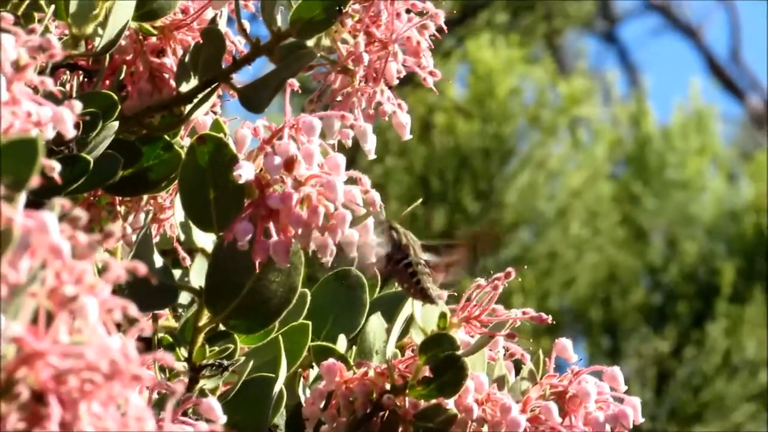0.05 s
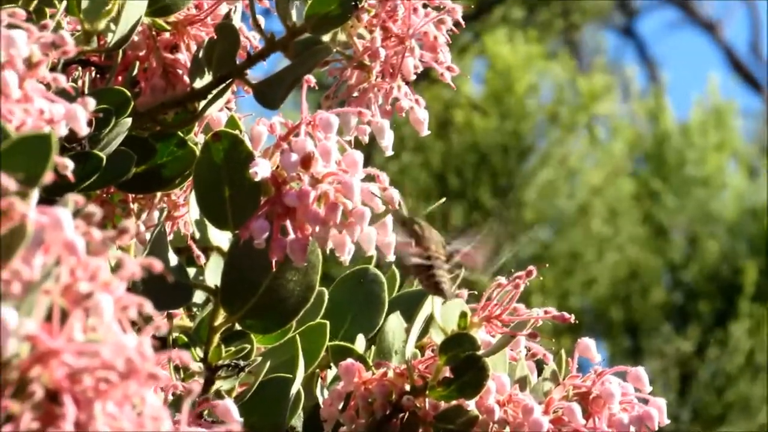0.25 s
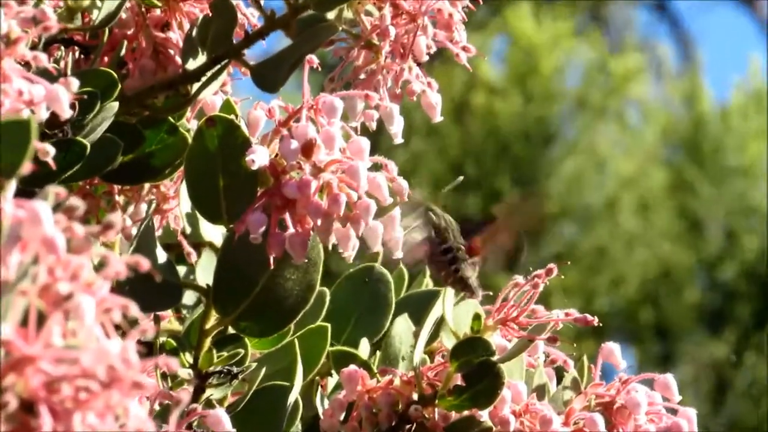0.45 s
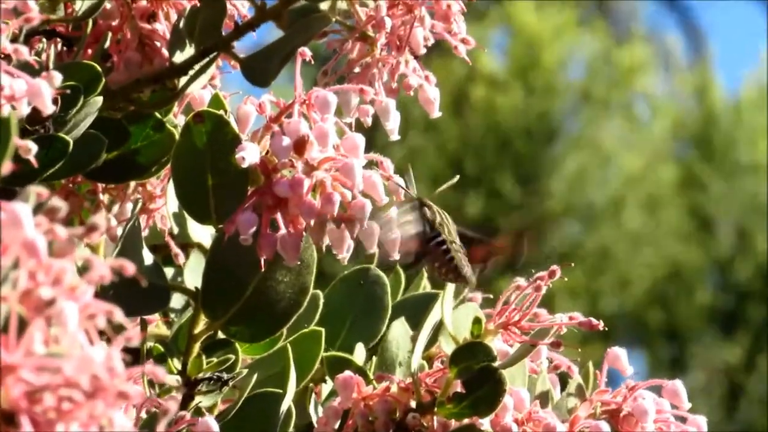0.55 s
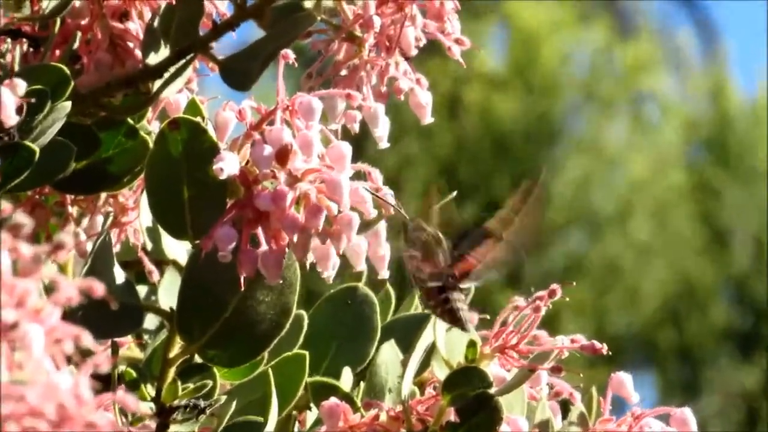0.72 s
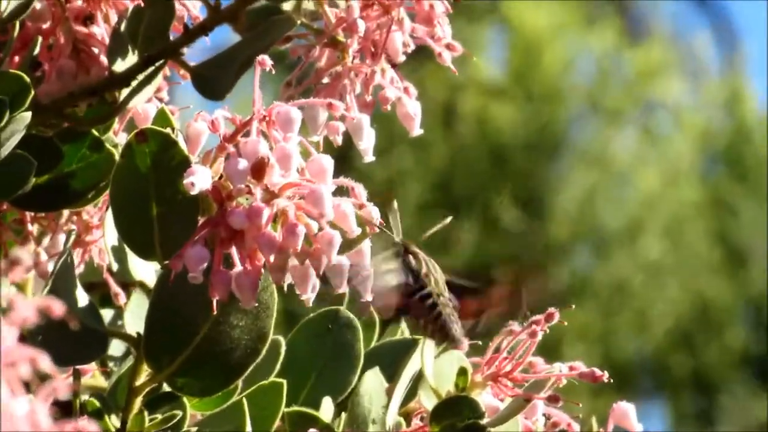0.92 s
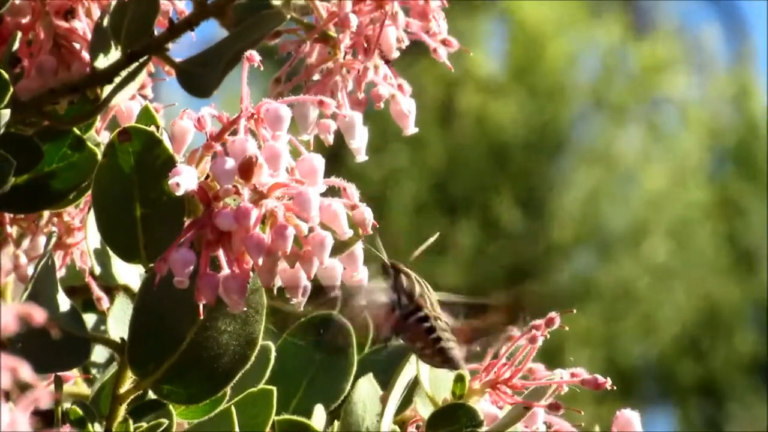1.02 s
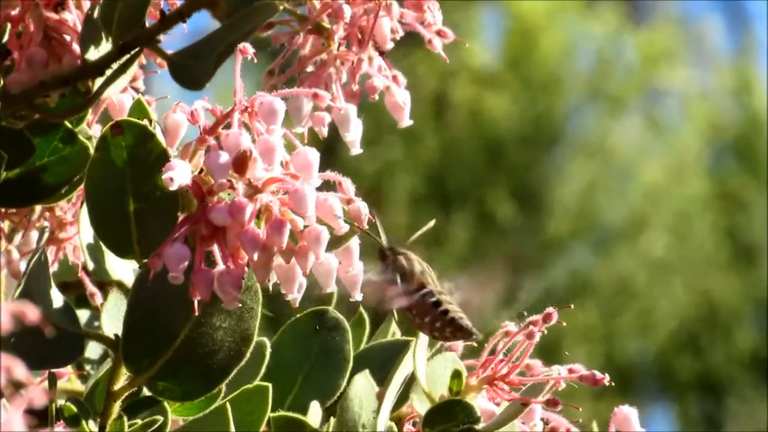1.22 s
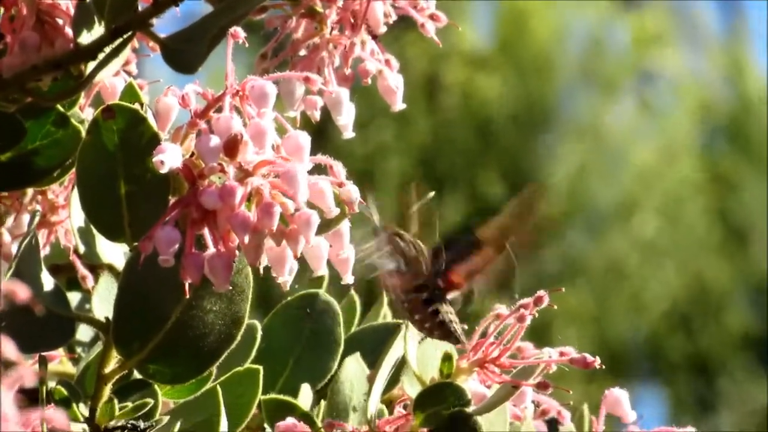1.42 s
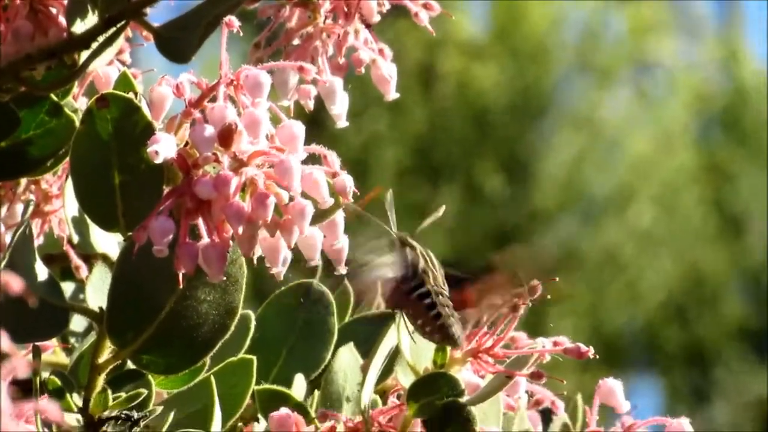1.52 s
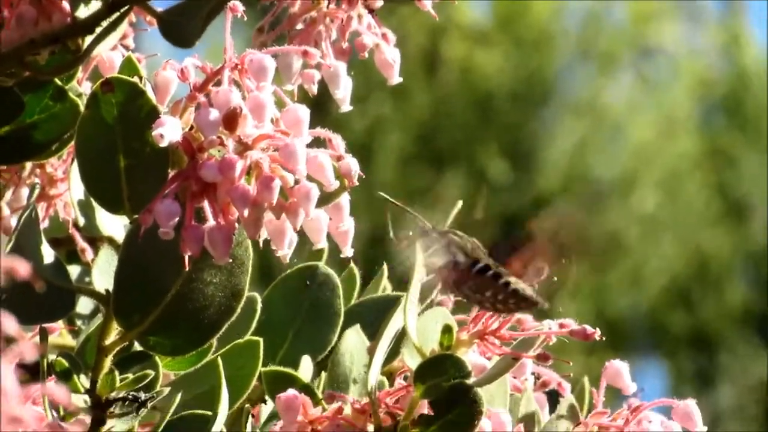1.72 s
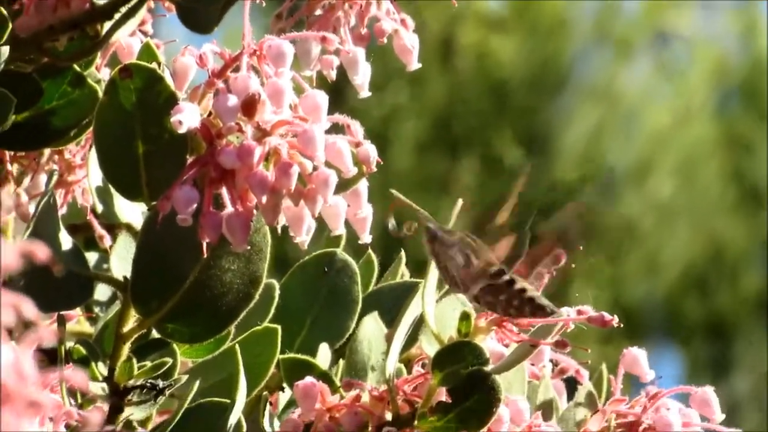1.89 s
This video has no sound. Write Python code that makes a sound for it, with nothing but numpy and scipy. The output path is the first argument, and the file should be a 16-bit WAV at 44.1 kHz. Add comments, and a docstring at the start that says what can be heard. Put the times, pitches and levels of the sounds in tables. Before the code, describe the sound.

A camera zoom lever snaps loudly, then its small lens motor buzzes evenly for under a second, close and mostly left; afterwards only faint outdoor rumble, hiss, tiny handling ticks and soft wind thumps remain.

```python
"""A small camera outdoors, heard at its two ports: distant rumble and hiss, wide and out of phase in the bass, as
filtered noise, with faint lever and grip ticks as decaying shell modes and wind thumps as short low pushes.
The zoom lever scrapes, as grainy noise, and snaps; then the lens motor steps about 120 times a second, its knocks
ringing the lens barrel and its rattle the housing, mostly on the left. After the motor stops, the air carries on
with a faint steady whine, a few more ticks and wind thumps."""
import sys
import numpy as np
from scipy import signal
from scipy.fft import rfft, irfft, next_fast_len
from scipy.io import wavfile
from scipy.ndimage import uniform_filter1d, map_coordinates

SR = 44100
rng = np.random.default_rng(int(sys.argv[2]) if len(sys.argv) > 2 else 0)


def log_audio(samples):
    """Write samples as a 16-bit WAV file to the path given in sys.argv[1]."""
    # one column per channel
    frames = np.atleast_2d(samples).T
    # limit to full scale, then quantise
    limited = np.clip(frames, -1, 1)
    pcm = np.round(limited * 32767).astype(np.int16)
    wavfile.write(sys.argv[1], SR, pcm)


def how_loud(loudness_db):
    """Turn decibels into a plain amplitude multiplier (0 dB gives 1, 20 dB gives 10)."""
    steps = np.asarray(loudness_db, float) / 20
    return 10 ** steps


N = 85995
T = np.arange(N) / SR
MOTOR_OFF_S = 1.172

# spectrum of the air common to both ports, before scaling: pitch_hz, density_db (per Hz)
AIR_MID_SPECTRUM = [(15, -49), (25, -8.5), (75, -0.5), (122, -2.5), (183, -4), (221, -2.5), (305, -2),
                    (433, -7), (482, -4), (631, -16), (945, -11), (2170, -32), (2850, -31.5), (3630, -34.5),
                    (3930, -33.5), (13500, -35), (15500, -41.5)]
# spectrum of the air opposed between the ports, before scaling: pitch_hz, density_db (per Hz)
AIR_SIDE_SPECTRUM = [(15, -54.5), (25, -10), (116, 0), (173, -1.5), (209, -18.5), (289, 1), (340, -15),
                     (445, -8), (684, -21.5), (1110, -21), (1900, -39.5), (2850, -40), (3170, -47),
                     (7500, -40.5), (15500, -44.5)]
# tilt of the air between the ports: pitch_hz, left_over_right_db
AIR_PORT_BALANCE = [(100, -1), (1000, 0.75), (3000, 1), (5700, 1.5), (7000, 9.5), (8300, 2), (9300, 5),
                    (10300, -2), (11600, -1.5), (14000, 0.5)]
# the air's level, sinking after the snap and dipping before the motor: time_s, bass_db, presence_db, treble_db
AIR_LEVEL_CURVE = [(0, 0, 6, 4.5), (.245, 4, 8.5, 3.5), (.256, -2, 15, -11), (0.319, -2.5, -3, 7),
                   (0.323, -11, 0, -13), (0.391, -23.5, 6, -3), (.396, -3.5, 4, -5), (.7, -1, -0.5, 1),
                   (1.1, 1.9, -1.2, 5.45), (1.95, 1, 0.5, 2.5)]
# ringing modes of the camera shell, relative levels: pitch_hz, left_db, right_db, t60_s (full, on the left)
SHELL_MODES = [(306, -61, -32.5, 0.09), (950, -36, -39, 0.09), (1194, -38.5, -43.5, 0.086),
               (1550, -30, -26, 0.065), (2030, -27.5, -37, 0.027), (2418, -18.5, -26.5, .02),
               (2716, -21.5, -20.5, 0.036), (3475, -16.5, -17.5, 0.0088), (3780, -25, -32.5, 0.029),
               (4565, -19.5, -21, 0.019), (5380, -13, -17.5, 0.017), (6166, -5, -27, 0.012),
               (7030, -8, -10, 0.0072), (7700, -9, -14.5, 0.0015), (9600, -13, -7, 0.0031),
               (11940, -27, -17, 0.0013), (13400, -23.5, -22, 0.0079)]
# clicks and ticks of lever, gears and grip:
# start_s, peak_db, strongest_hz, spread_octaves, left_over_right_db, ring_share (of full ring time)
SHELL_CLICKS = [(0.0148, -41.5, 1180, 0.14, -10, 0.42), (0.223, -64, 310, .4, -11.2, 0.66),
                (0.244, -1.5, 6340, 4.5, -0.4, 0.99), (0.2682, -38.5, 7300, 0.32, 4, 0.87),
                (0.3312, -45.5, 2410, 0.26, 13, 1.2), (0.3492, -25, 1560, 1.06, 3, 0.56),
                (1.18, -53, 1550, 0.16, 2, .6), (1.211, -46.5, 8050, 0.5, -1, .5),
                (1.296, -43, 330, .5, 3, 1.3), (1.2985, -46, 1300, .75, 4, 1.2),
                (1.3718, -45.5, 7700, 0.17, .1, .6), (1.4275, -59.5, 7700, .4, .1, 0.65),
                (1.4755, -43.5, 7500, 0.36, -5, 0.86), (1.488, -58, 7600, 0.39, -4, 0.73),
                (1.5831, -47.5, 6500, .7, -10, .6), (1.6125, -53, 7240, 0.33, .1, 0.84),
                (1.916, -57.5, 2500, 0.51, -1, .6)]
# wind thumps on the ports: centre_s, envelope_peak_db, pitch_hz, left_over_right_db
WIND_THUMPS = [(0.141, -35.5, 68.4, 5), (0.212, -53, 90, -16.5), (0.607, -36, 49, 3), (.98, -47, 55, 0),
               (1.12, -30, 62, -6), (1.463, -39, 69, 2), (1.499, -32, 101, -1), (1.521, -28.5, 77.5, 3.8),
               (1.689, -34.5, 56.2, -9.5), (1.747, -26.5, 91, -3), (1.776, -29, 77, -5),
               (1.801, -28.5, 70, -2), (1.834, -24.5, 89, -4), (1.94, -39, 50, -9.5)]
# motor housing resonances, relative levels: pitch_hz, width_hz, left_db, right_db, even_over_odd_steps_db
HOUSING_MODES = [(1550, 97, -4.5, -18, -5), (2490, 290, -2, -12.5, 0.5), (3180, 420, -11, -11.5, 7),
                 (3610, 400, -7.5, -12, 1), (4800, 1500, -11.5, -28, -5), (5460, 70, -0.5, -31, 0),
                 (6600, 950, -1, -30, -12), (8000, 560, -11, -4.5, 5), (8000, 370, -6, -18, 5),
                 (9330, 500, -5.5, -7.5, -25), (10500, 990, -14.5, -15, -3), (11740, 340, -11, -7, 3),
                 (13000, 810, -25, -18, -11), (14800, 820, -31.5, -15, -9)]
# how hard the steps knock the barrel, relative: time_s, level_db
BARREL_KNOCK_LEVEL = [(.39, 10), (.47, -0.5), (.7, -3.5), (.9, 3.5), (1.0, 2.5), (1.17, 1)]
# motor hum partials, level before wobble: multiple_of_step_rate, peak_db
HUM_PARTIALS = [(1, -60.5), (2, -68)]


def unit(x):
    """Scale to rms 1."""
    return x / np.sqrt(np.mean(x ** 2) + 1e-20)


def along(points, hz):
    """Read (Hz, value) points on a log frequency axis."""
    f, value = np.transpose(points)
    return np.interp(np.log(hz + 1), np.log(f + 1), value)


def filtered(x, response):
    """Shape x by a complex response of frequency, with room for the tail."""
    m = next_fast_len(N + 8192)
    return irfft(rfft(x, m) * response(np.fft.rfftfreq(m, 1 / SR)), m)[..., :N]


def wobble(rate):
    """A smooth random curve, rate knots a second."""
    return map_coordinates(rng.standard_normal(int(N * rate / SR) + 4), [T * rate])


def resonance(hz, centre_hz, width_hz):
    """Causal band-pass of peak gain 1."""
    return 1j * hz * width_hz / (centre_hz ** 2 - hz ** 2 + 1j * hz * width_hz)


def ports(left, right):
    """Stack a left and a right value as a column."""
    return np.array([[left], [right]])


def noise_pair(alike):
    """Two noises that share the fraction alike of their power."""
    shared, left, right = rng.standard_normal((3, N))
    alike = np.clip(alike, 0, 1)
    return np.sqrt(alike) * shared + np.sqrt(1 - alike) * np.array([left, right])


def air():
    """Far rumble and hiss: uneven noise, stronger in the difference of the ports, notched in the low mids."""
    mid_db, side_db = -54, -48  # rms before port balance and level curve
    whine_hz, whine_db = 12767, -83  # level before port balance and level curve
    notch_hz, notch_width_hz, notch_depth = 700, 117, 0.75
    presence_hz, treble_hz = 1700, 6000  # band edges

    def notch(f):
        return 1 - notch_depth * np.exp(-((f - notch_hz) / notch_width_hz * 2) ** 2)

    # slow patches of slightly louder and softer noise across time and frequency
    z = signal.stft(rng.standard_normal((2, N)), nperseg=512)[2]
    field = uniform_filter1d(rng.standard_normal(z.shape[1:]), size=5, axis=0)
    field = uniform_filter1d(field, size=8, axis=1)
    a, b = signal.istft(z * how_loud(1.2 * unit(field)), nperseg=512)[1][:, :N]

    mid = how_loud(mid_db) * unit(filtered(a, lambda f: how_loud(along(AIR_MID_SPECTRUM, f)) * notch(f)))
    side = how_loud(side_db) * unit(filtered(b, lambda f: how_loud(along(AIR_SIDE_SPECTRUM, f)) * notch(f)))
    side = side + how_loud(whine_db) * np.sin(2 * np.pi * whine_hz * T) * (T > MOTOR_OFF_S)
    pair = np.array([mid + side, mid - side])
    pair = filtered(pair, lambda f: how_loud(along(AIR_PORT_BALANCE, f) * ports(.5, -.5)))

    def below(edge_hz):
        return filtered(pair, lambda f: 1 / (1 + (f / edge_hz) ** 6))

    low, middle = below(presence_hz), below(treble_hz)
    bands = [low, middle - low, pair - middle]
    s, *levels = np.transpose(AIR_LEVEL_CURVE)
    return sum(band * how_loud(np.interp(T, s, db)) for band, db in zip(bands, levels))


def clicks():
    """Each click rings the shell modes nearest its own colour; the ring is rough and dies sooner on the right."""
    rise_s, hold_s = 0.00033, 0.00059  # on the left; hold is the time from the start to the fade
    right_time = 0.38  # right rise, hold and ring times over left
    roughness = 0.082  # phase wander, rad a sample
    hz, left_db, right_db, t60 = np.transpose(SHELL_MODES)
    out = np.zeros((2, N + SR))
    t = np.arange(SR // 20) / SR
    stretch = np.array([1, right_time])[:, None, None]
    rise = np.sin(np.pi / 2 * np.clip(t / (stretch * rise_s), 0, 1))
    fade_age = np.maximum(t - stretch * hold_s, 0)
    for s, db, centre_hz, spread, pan_db, ring_share in SHELL_CLICKS:
        nearness = np.exp(-.5 * (np.log2(hz / centre_hz) / spread) ** 2)
        colour = nearness * how_loud(np.array([left_db + pan_db / 2, right_db - pan_db / 2]))
        decay = rise * how_loud(-60 * fade_age / (stretch * ring_share * t60[:, None]))
        wander = roughness * np.cumsum(rng.standard_normal((2, len(hz), len(t))), axis=2)
        wander = wander + np.pi * np.arange(len(hz))[:, None]  # neighbouring modes start opposed
        modes = np.sin(2 * np.pi * hz[:, None] * t + wander)
        ring = np.sum(colour[..., None] * decay * modes, axis=1)
        out[:, round(s * SR):][:, :len(t)] += how_loud(db) * ring / np.abs(ring).max()
    return out[:, :N]


def wind():
    """Short low pushes of air, under a bell-shaped envelope, nearly opposite on the two ports."""
    half_width_cycles = 0.67  # to 1/e of the envelope
    out = np.zeros((2, N))
    chance = rng.standard_normal((len(WIND_THUMPS), 2))
    for (s, db, hz, pan_db), (turn, skew) in zip(WIND_THUMPS, chance):
        cycles = (T - s) * hz
        phase = turn + ports(0.22 + 0.11 * skew, np.pi)
        push = np.exp(-(cycles / half_width_cycles) ** 2) * np.cos(2 * np.pi * cycles + phase)
        out += how_loud(db + ports(pan_db / 2, -pan_db / 2)) * push
    return out


def scrape():
    """The lever slides before the snap: grainy noise through the upper shell modes."""
    start_s, end_s, level_db = .2205, .2355, -47
    lowest_hz, tilt_db = 1800, -5  # tilt per octave

    def shell(f):
        total = 0
        for k, (hz, left_db, right_db, t60) in enumerate(SHELL_MODES):
            if hz > lowest_hz:
                gain = how_loud(ports(left_db, right_db) + tilt_db * np.log2(hz / 6000))
                total = total + (-1) ** k * gain * resonance(f, hz, 0.73 / t60 + 250)
        return total

    stroke = np.clip(np.minimum(T - start_s, end_s - T) / .002, 0, 1)  # 2 ms edges
    grain = how_loud(2.5 * wobble(500))
    shell_rms = np.sqrt(np.mean(np.abs(shell(np.linspace(0, SR / 2, 999))) ** 2))
    return how_loud(level_db) * filtered(noise_pair(0.15) * stroke * grain, shell) / shell_rms


def motor():
    """Steps knock the barrel and rattle the housing over sliding noise and hum; odd and even steps differ in colour."""
    on_s, first_step_s, step_hz, run_down_s = .3925, .3972, 119.75, .009
    rise_s, fall_s, scatter_db, jitter_s = .0004, .0016, 1.5, .00012  # of each step
    motor_db, slide_db, rattle_db = -41, -5, 3.5  # motor_db scales all but the hum; the others are relative
    kick_db, kick_s, kick_hz = 1.5, 0.042, 2304  # extra resonance around the start
    barrel_hz, barrel_width_hz = 2575, 187
    barrel_db = ports(23.5, 1.5)  # relative

    count = int((MOTOR_OFF_S - first_step_s) * step_hz) + 2
    size, late = rng.standard_normal((200, 2))[:count].T
    times = first_step_s + np.arange(count) / step_hz + jitter_s * late
    beats = np.zeros((2, N))  # even steps, odd steps
    beats[np.arange(count) % 2, np.round(times * SR).astype(int)] = how_loud(scatter_db * size)
    age = np.arange(SR // 100) / SR
    step_shape = (1 - np.exp(-age / rise_s)) * np.exp(-age / fall_s)
    bursts = signal.fftconvolve(beats, step_shape[None], axes=1)[:, :N]

    running = (T > on_s) * np.exp(-np.maximum(T - MOTOR_OFF_S, 0) / run_down_s)
    noise = noise_pair(0.9)
    even, odd = [how_loud(rattle_db) * noise * burst for burst in bursts]

    knocks = beats.sum(axis=0) * how_loud(np.interp(T, *np.transpose(BARREL_KNOCK_LEVEL)))

    def barrel_ring(f):
        return resonance(f, barrel_hz, barrel_width_hz) * resonance(f, barrel_hz, 1100)

    barrel = how_loud(barrel_db) * filtered(knocks, barrel_ring)

    def housing(f, share):
        total = 0
        for k, (hz, width_hz, left_db, right_db, even_db) in enumerate(HOUSING_MODES):
            gain = how_loud(ports(left_db, right_db) + share * even_db)
            total = total + (-1) ** k * gain * resonance(f, hz, width_hz)
        return total

    whirr = filtered(odd + how_loud(slide_db) * noise * running, lambda f: housing(f, share=0))
    whirr = whirr + filtered(even, lambda f: housing(f, share=1))

    around_start = np.exp(-np.abs(T - on_s) / kick_s)
    kick = filtered((even + odd + noise * running) * around_start, lambda f: resonance(f, kick_hz, 520))
    kick = how_loud(kick_db + ports(3, -6)) * kick

    hum = np.zeros(N)
    for multiple, db in HUM_PARTIALS:
        level = how_loud(db + 3.2 * wobble(25))
        hum += level * np.sin(2 * np.pi * multiple * step_hz * T + 1.45 * wobble(25.1))
    return how_loud(motor_db) * (whirr + barrel + kick) + hum * running


def scene():
    """All sources summed at the two ports."""
    return air() + clicks() + wind() + scrape() + motor()


def band_limit(x):
    """A steep low-pass at the top of the band."""
    return signal.sosfilt(signal.butter(12, 16310, fs=SR, output="sos"), x)


def record(dry):
    """The top of the treble is cut off sharply."""
    top_hz = 15050
    mix = filtered(dry, lambda f: f < top_hz)
    return band_limit(mix)


dry = scene()
out = record(dry)
log_audio(out)
```